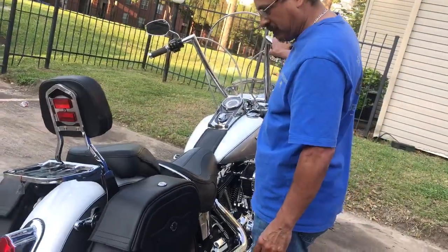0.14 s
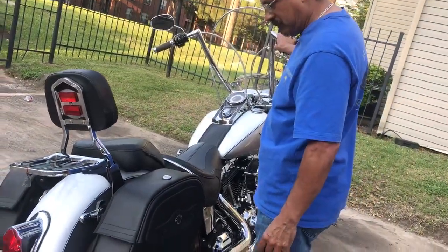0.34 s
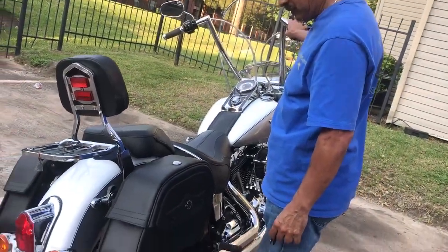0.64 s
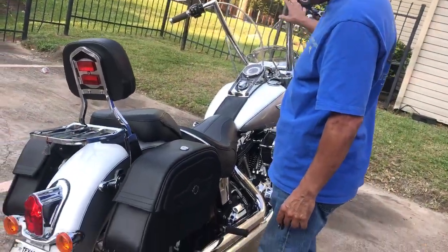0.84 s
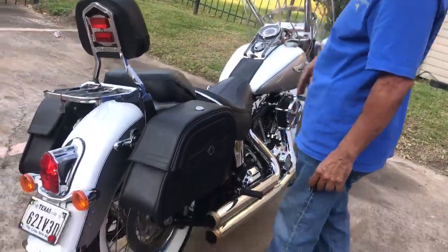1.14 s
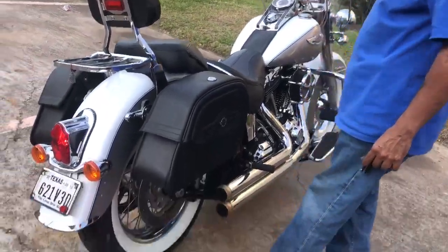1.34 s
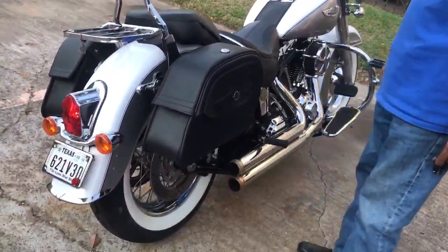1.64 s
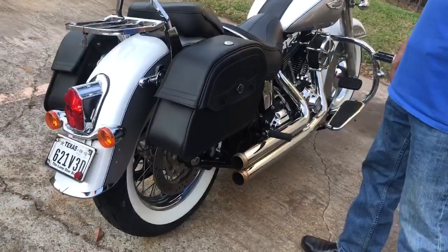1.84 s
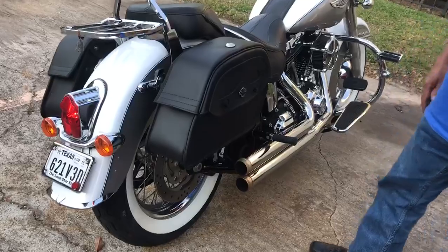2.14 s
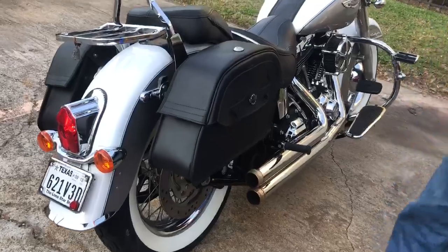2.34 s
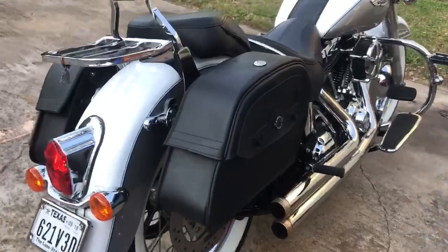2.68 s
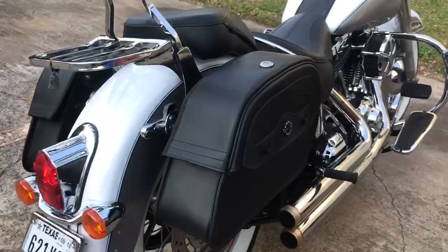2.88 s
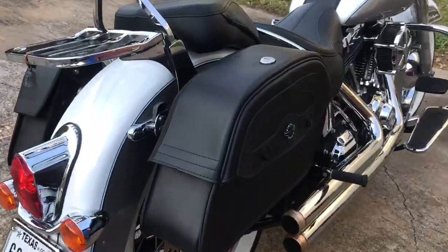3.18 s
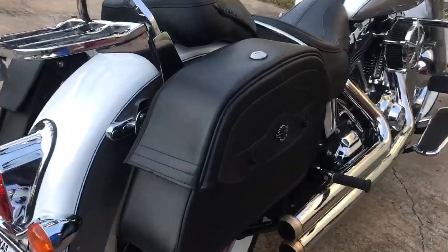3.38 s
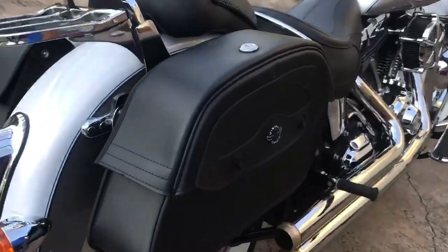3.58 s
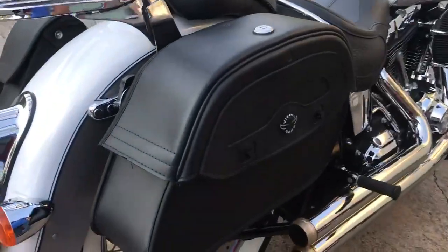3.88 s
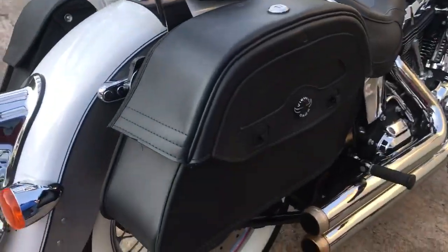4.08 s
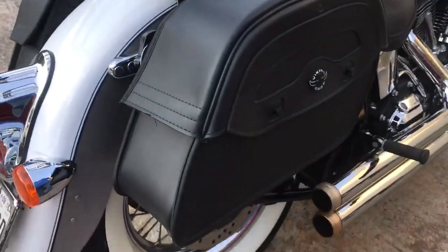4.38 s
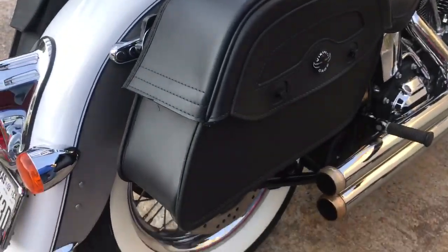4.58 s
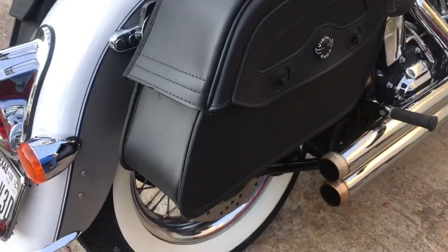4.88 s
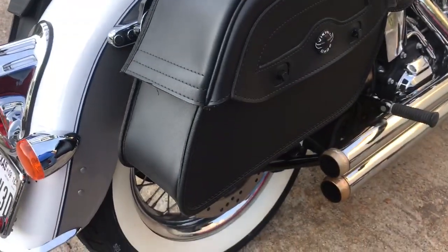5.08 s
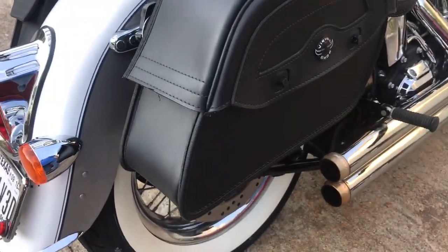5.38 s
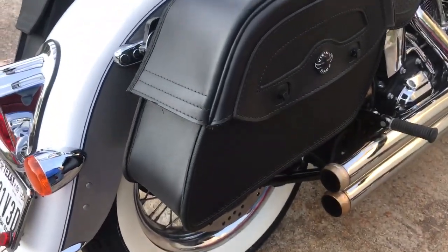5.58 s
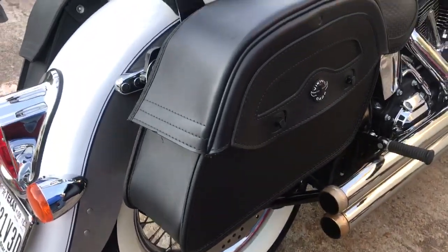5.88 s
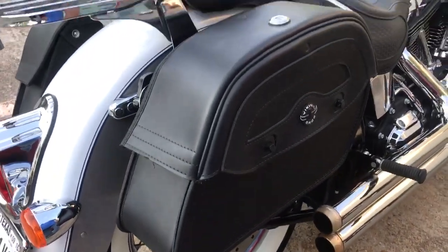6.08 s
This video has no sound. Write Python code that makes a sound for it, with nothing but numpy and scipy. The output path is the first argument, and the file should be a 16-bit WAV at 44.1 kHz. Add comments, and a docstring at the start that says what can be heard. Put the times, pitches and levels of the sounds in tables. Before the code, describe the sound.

Outdoors, close to a large motorcycle, an electric starter whines and grinds, sagging over several compressions for about half a second. The engine catches with a deep bang, races briefly, then drops into a loping two-cylinder idle. Sharp exhaust barks and low booms come unevenly, with skipped beats, over valve ticks and mechanical rustle.

```python
"""Outdoors, a big V-twin motorcycle starts: the electric starter labours over compressions with whirring gears,
then the engine catches with a bang and settles into a loping idle with skipped beats.
Each cylinder blows into its own open pipe: a noisy jet rings the pipe mouth as a sharp bark, and the gas
column booms as a sum of sines that slide in pitch. Valves tick and ring; the engine rustles as shaped noise."""
import sys
import numpy as np
from scipy.fft import rfft, irfft, next_fast_len
from scipy.io import wavfile
from scipy.ndimage import map_coordinates

SR = 44100
rng = np.random.default_rng(int(sys.argv[2]) if len(sys.argv) > 2 else 0)


def bounce(signal):
    """Save signal as a 16-bit WAV file at the path given by the first command-line argument."""
    frames = np.transpose(np.atleast_2d(signal))
    limited = np.clip(frames, -1, 1)
    pcm = np.round(limited * 32767).astype(np.int16)
    wavfile.write(sys.argv[1], SR, pcm)


N = 274302
TIME = np.arange(N) / SR  # seconds from the beginning
AGE = np.arange(SR // 4) / SR  # seconds since a stroke or knock


def amp(db):
    """Turn decibels into gain."""
    return 10 ** (np.asarray(db) / 20)


def unit(x):
    """Scale to rms 1."""
    return x / np.sqrt(np.mean(x ** 2) + 1e-20)


def curve(rows):
    """Join (time_s, value) rows with straight lines, one value per sample."""
    return np.interp(TIME, *np.transpose(rows))


def wobble(rate):
    """A smooth random curve through `rate` random points a second."""
    points = rng.standard_normal(int(N * rate / SR) + 4)
    return map_coordinates(points, [TIME * rate], order=2)


def noise(spectrum):
    """Noise of rms 1, coloured by (pitch_hz, level_db) rows."""
    pitch_hz, level_db = np.transpose(spectrum)
    size = next_fast_len(N + 8192)
    log_hz = np.log(np.fft.rfftfreq(size, 1 / SR) + 1)
    gain = amp(np.interp(log_hz, np.log(pitch_hz), level_db))
    white = rng.standard_normal(size)
    return unit(irfft(rfft(white) * gain, size)[:N])


def add(track, start_s, sound):
    """Mix a sound into a track, cutting it off at the track's end."""
    start = max(round(start_s * SR), 0)
    part = track[start:start + len(sound)]
    part += sound[:len(part)]


def burst(rise_s, t60_s):
    """A loudness shape of peak 1 that swells, then dies; t60_s is the time to fall 60 dB."""
    shape = (1 - np.exp(-(AGE / rise_s) ** 2)) * amp(-60 * AGE / t60_s)
    return shape / shape.max()


def boom(pipe):
    """The gas column rings; its modes slide in pitch as the outflow dies, a little differently each time."""
    out = np.zeros(len(AGE))
    for start_hz, end_hz, glide_s, swell_s, t60_s, level_db in pipe:
        heat, pace, size = 1 + np.array([.012, .05, .08]) * rng.standard_normal(3)
        slide = np.exp(-(pace * AGE / glide_s) ** 2)
        pitch_hz = heat * (end_hz + (start_hz - end_hz) * slide)
        wave = np.sin(2 * np.pi * np.cumsum(pitch_hz) / SR)
        swell = 1 - np.exp(-AGE / swell_s)
        out += size * amp(level_db - 60 * AGE / t60_s) * swell * wave
    return out


def ring(modes, rise_s, slide=0, detune=0.042):
    """Short ringing modes; pitches, strengths and phases are drawn anew each time, and slide > 0 bends them up."""
    pitch_hz, level_db, t60_s = np.transpose(modes)
    pitch_change, size, phase = rng.standard_normal((3, len(pitch_hz)))
    gain = amp(level_db + 4.5 * size)
    clock = np.cumsum(1 + slide * (AGE / .03 - 1 / 2) / (1 + AGE / .03)) / SR
    turns = np.outer(pitch_hz * (1 + detune * pitch_change), clock)
    waves = np.sin(2 * np.pi * (turns + phase[:, None]))
    shapes = [burst(rise_s, life_s) for life_s in t60_s]
    return gain / np.linalg.norm(gain) @ (waves * shapes)


# The starter pushes a piston over the top: time_s [s], load_db [dB, relative].
COMPRESSIONS = [(-.03, -33), (.197, -19.5), (.4, -21), (.562, -19)]
# Unburnt air leaves the pipes: start_s [s], level_db [dB, relative].
PUFFS = [(.125, -29), (.28, -28), (.49, -28), (.56, -29)]
# Colour of the gear whirr: pitch_hz [Hz], level_db [dB per Hz, relative].
WHIRR_COLOUR = [(60, -0.5), (130, -5), (300, -4.5), (600, -15), (790, -3), (900, -7), (1500, -5.5),
                (2300, -12.5), (3300, -25.5), (4000, -25), (6200, -29), (7800, -43), (10000, -36.5),
                (16000, -72)]
TAKE_UP_S, TAKE_UP_DB = 0.016, -6.5  # the gears also knock together just before each compression
FREE_MESH_HZ, SAG_HZ = 1775, 710  # gear whine when spinning freely, and its drop under load
SAG_LAG_S, SAG_FALL_S, SAG_RECOVER_S = 0.034, .029, .036  # the motor is slowest just after the top
FREE_DB, LABOUR_DB, LABOUR_RISE_S, LABOUR_FADE_S = -33, 5, 0.011, 0.078  # gear noise, and its swell under load
# faint high hiss that swells about 0.12 s after each compression
HISS_DB, HISS_SWELL_DB, HISS_LAG_S, HISS_WIDTH_S = -71, 12, 0.12, 0.039


def starter():
    """Gears whirr and whine; each compression slows them down and makes them grind."""
    cranking = np.clip((CATCH[0][0] + 0.015 - TIME) / 0.02, 0, 1)  # fades out as the engine catches
    load, puffs, labour, sag, hiss_swell = np.zeros((5, N))
    for top_s, load_db in COMPRESSIONS:
        since = TIME - top_s
        labour += np.exp(-np.where(since < 0, (since / LABOUR_RISE_S) ** 2, since / LABOUR_FADE_S))
        sag_width = np.where(since < SAG_LAG_S, SAG_FALL_S, SAG_RECOVER_S)
        sag += np.exp(-((since - SAG_LAG_S) / sag_width) ** 2)
        hiss_swell += np.exp(-((since - HISS_LAG_S) / HISS_WIDTH_S) ** 2)
        for lead_s, knock_db in (0, load_db), (TAKE_UP_S, load_db + TAKE_UP_DB):
            # each knock begins 6 ms early, to swell up towards its moment
            load += amp(knock_db) * np.interp(since + lead_s + .006, AGE, burst(.005, .09))
    for start_s, level_db in PUFFS:
        add(puffs, start_s, amp(level_db) * boom([(58, 80, .08, .04, .3, 14)]))

    level = amp(FREE_DB + LABOUR_DB * labour)
    mesh_hz = (FREE_MESH_HZ - SAG_HZ * sag) * (1 + .03 * wobble(300))
    phase = 2 * np.pi * np.cumsum(mesh_hz) / SR
    whine = (np.sin(phase) + .25 * np.sin(phase * 2 / 3)) * amp(2.5 * wobble(160))
    strain = .3 * level + 1.25 * load
    whirr = (level * amp(0.5 + 1.44 * wobble(149.2)) + amp(-5) * load) * noise(WHIRR_COLOUR)
    grind_colour = [(1500, -30), (2600, 5), (3400, 0), (6200, -4), (7800, -31), (16000, -33)]
    grind = amp(-13.5) * load * noise(grind_colour)
    hiss_colour = [(5000, -35), (9000, -6), (13000, -1), (16000, -10)]
    hiss = amp(HISS_DB + HISS_SWELL_DB * hiss_swell) * noise(hiss_colour)
    return cranking * (strain * whine + whirr + grind + hiss) + puffs * amp(6.0 * wobble(62.5))


# Short rings of the pipe mouths: pitch_hz [Hz, typical], level_db [dB, relative], t60_s [s].
BARK_MODES = [(568.5, -18.5, 0.15), (933, -7, 0.021), (1420, 5, 0.013), (2199, 3, 0.037),
              (2824, -2.5, 0.019)]
CRACK_MODES = [(3928, -2.5, 0.037), (4440, 1.5, 0.016), (5590, 10, 0.019), (6450, -4, 0.025)]
# Colours of the jet noise: pitch_hz [Hz], level_db [dB per Hz, relative].
BARK_COLOUR = [(200, 7), (450, -12.5), (700, -4), (1000, 6.5), (1400, 1.5), (2300, 2.5), (2900, -5),
               (3400, -20.5), (6000, -33.5)]
CRACK_COLOUR = [(1800, -1), (3200, -0.5), (4300, -1), (5500, 3), (6400, 1.5), (7300, -9), (10000, -8.5),
                (13000, -13), (16000, -24)]
# Hollow ring after each stroke: time_s [s], pitch_hz [Hz, before a small random drift].
HOLLOW_PITCH = [(1.0, 1444), (2.0, 1488), (3.24, 1417), (3.9, 1273), (6.2, 1357)]
# How squarely the pipes face the microphone: time_s [s], level_db [dB, of the hollow ring].
MOUTH = [(.62, -4.5), (2.2, 2), (2.9, 6), (4, 7), (4.6, 1)]
CLEAR_DB, JET_DB = 5, -2.5  # strength of the mouth rings, and of the bark's jet noise
FLARE_FLOW, FLARE_END_S, FLARE_FADE_S = 0.83, 1.24, 0.28  # extra gas flow (0-1) while the engine races


def exhaust(strokes, pipe, rise_s, blow_t60_s, tail_db, hollow_db):
    """Each stroke is a jet of noise that rings the pipe mouth, booms the pipe and leaves a rushing tail."""
    booms, rings, bark, crack, hollow, roar = np.zeros((6, N))
    jet, tail, pop = burst(rise_s, blow_t60_s), burst(0.0065, 0.12), burst(0.0015, 0.005)
    for start_s, boom_db, bark_db, crack_db in strokes:
        flare = FLARE_FLOW * np.clip((FLARE_END_S - start_s) / FLARE_FADE_S, 0, 1)
        add(booms, start_s, amp(boom_db - 135 * flare * AGE) * boom(pipe))  # fast outflow damps the pipe
        add(roar, start_s, amp(boom_db - 22 + 16 * flare) * burst(.006, .08))
        add(rings, start_s, amp(bark_db + CLEAR_DB) * ring(BARK_MODES, 0.23 * rise_s, slide=0.051))
        add(rings, start_s, amp(crack_db + CLEAR_DB) * ring(CRACK_MODES, rise_s))
        add(bark, start_s - .002, amp(bark_db - 0.5) * pop)  # the valve cracks open just before the jet
        add(bark, start_s, amp(bark_db + JET_DB) * (jet + amp(tail_db) * tail))
        add(crack, start_s, amp(crack_db) * (jet + amp(tail_db - 6.5) * tail))
        add(hollow, start_s, amp(0.5 * bark_db + hollow_db) * burst(0.0043, 0.15))

    ring_strength = wobble(220)
    ring_hz = curve(HOLLOW_PITCH) + 70 * wobble(30)
    hollow_ring = unit(ring_strength * np.sin(2 * np.pi * np.cumsum(ring_hz) / SR))
    roar_colour = [(120, -8.5), (280, -1.5), (420, -17.5), (1500, -51)]
    turbulence = bark * noise(BARK_COLOUR) + crack * noise(CRACK_COLOUR) + roar * noise(roar_colour)
    return booms + rings + turbulence + amp(curve(MOUTH)) * hollow * hollow_ring


# The first, slow-burning charge: start_s [s], boom_db, bark_db, crack_db [dB, relative].
CATCH = [(.6185, -5.5, -10.5, -20)]
# Pipe modes of that bang, typical values: start_hz, end_hz [Hz], glide_s, swell_s, t60_s [s],
# level_db [dB, relative].
CATCH_PIPE = [(52, 123, 0.046, 0.037, 0.18, 15.5), (133, 360, 0.021, 0.069, 0.1, 2.5),
              (283, 400, .03, 0.021, 0.051, -16)]


def first_bang():
    """The engine catches: one slow burn gives a longer jet and a deep boom."""
    return exhaust(CATCH, CATCH_PIPE, rise_s=0.006, blow_t60_s=0.07, tail_db=-10, hollow_db=-20)


# The engine races as it catches, then hunts around its idle: time_s [s], crank_rpm [turns a minute].
SPEED = [(0.7, 1114.5), (0.95, 1203.4), (1.25, 1044.5), (1.55, 1003.9), (2.0, 1032.9), (2.15, 984.2),
         (2.45, 1034.4), (3.05, 926.9), (3.65, 921.3), (3.8, 954.5), (4.4, 948.7), (5.15, 1009.5),
         (5.45, 990.0), (6.2, 1083.8)]
FIRST_STROKE_S = .696


def firing_times(lag):
    """A cylinder fires once in two crank turns, lag cycles after the front one."""
    running = TIME >= FIRST_STROKE_S
    cycles = np.cumsum(curve(SPEED)[running]) / (2 * 60 * SR)
    return np.interp(np.arange(lag, cycles[-1]), cycles, TIME[running])


# Strength of an ordinary exhaust stroke: time_s [s], boom_db, bark_db [dB, before each cylinder's offset].
EFFORT = [(.7, -9, -11.5), (.88, -10, -14.5), (1.15, -14.5, -19), (1.9, -12.5, -22.5), (2.4, -11.5, -20),
          (3.2, -10.5, -17.5), (4.0, -10.5, -17), (4.8, -11.5, -18), (6.2, -11.5, -21)]
# Charges that burn badly (below 0) or bang (above 0): time_s [s], boom_change_db, bark_change_db [dB].
ODD_BURNS = [(.742, -1.5, -2.5), (.801, -2, 0.5), (.947, -6, -15), (1.004, -5.5, -8), (1.052, -8, -29),
             (1.219, -0.5, -6.5), (1.271, -4.5, -9), (1.502, -1, -7.5), (2.093, 1, 5.5), (2.161, 1.5, 3.5),
             (2.282, -1, 5), (2.568, -7.5, -18), (2.756, -13, -16), (2.934, -0.5, 5.5), (3.012, -6.5, -29),
             (3.063, -4.5, -6), (3.193, -0.5, 5.5), (3.263, -5, -8), (3.322, -0.5, -4), (3.451, -0.5, -0.5),
             (3.523, -4, -9), (3.577, -9.5, -25), (3.781, -6.5, -12), (3.836, -0.5, -5), (3.963, 0, 0),
             (4.035, -13, -39), (4.09, 2, 3), (4.342, -6.5, -19), (4.413, 0.5, 3), (4.595, -23, -24),
             (4.838, -0.5, -12.5), (5.2, -1, -9), (5.44, -12, -15), (5.678, -4, -11.5), (5.745, -1.5, 3),
             (5.912, -2.5, -27)]
REBOUND_BOOM_DB, REBOUND_BARK_DB = 1.5, 2.5  # leftover fuel strengthens the same cylinder's next stroke
FULL_MISS_DB = 20.5  # a bark this much weaker leaves all the fuel unburnt
SCATTER_DB = 3.87  # chance difference between barks; booms get half of it


def cylinder(lag, boom_db, bark_db, crack_db):
    """List the strokes (start_s, boom_db, bark_db, crack_db): effort sets each, and a misfire feeds the next."""
    start_s = firing_times(lag)
    effort_s, effort_boom_db, effort_bark_db = np.transpose(EFFORT)
    odd = np.array(ODD_BURNS)
    is_odd = abs(start_s[:, None] - odd[:, 0]) < .02  # strokes within 20 ms of a listed burn
    boom_change, bark_change = (is_odd @ odd[:, 1:]).T
    leftover = np.r_[0, np.clip(-bark_change[:-1] / FULL_MISS_DB, 0, 1)]
    chance = SCATTER_DB * rng.standard_normal(len(start_s))
    boom_level = np.interp(start_s, effort_s, effort_boom_db) + boom_change
    boom_level += REBOUND_BOOM_DB * leftover + boom_db + chance / 2
    bark_level = np.interp(start_s, effort_s, effort_bark_db) + bark_change
    bark_level += REBOUND_BARK_DB * leftover + bark_db + chance
    return np.transpose([start_s, boom_level, bark_level, bark_level + crack_db])


# Front pipe modes, typical values: start_hz, end_hz [Hz], glide_s, swell_s, t60_s [s], level_db [dB, relative].
FRONT_PIPE = [(46.5, 78.7, 0.022, 0.036, 0.23, 8), (183.6, 59.2, 0.0098, 0.02, 0.13, 11),
              (157.2, 290, 0.02337, 0.027, 0.13, 5), (250, 420, 0.0242, 0.0037, 0.05, -18.5)]


def front_cylinder():
    """The front cylinder's strokes blow into its own pipe."""
    strokes = cylinder(0, boom_db=0.9, bark_db=-2.07, crack_db=-8)
    return exhaust(strokes, FRONT_PIPE, rise_s=0.0023, blow_t60_s=0.022, tail_db=-7, hollow_db=-21.0)


# Rear pipe modes, typical values: start_hz, end_hz [Hz], glide_s, swell_s, t60_s [s], level_db [dB, relative].
REAR_PIPE = [(43.7, 107.7, .021, 0.027, 0.25, 7.5), (193.4, 62.1, 0.011, .019, 0.13, 9),
             (202, 295, 0.0255, 0.018, 0.12, -14)]
REAR_LAG = .4364  # share of a cycle from the front stroke to the rear one


def rear_cylinder():
    """The rear cylinder fires less than half a cycle after the front one, so the beat lopes."""
    strokes = cylinder(REAR_LAG, boom_db=1.0, bark_db=-0.9, crack_db=-9.0)
    return exhaust(strokes, REAR_PIPE, rise_s=0.0019, blow_t60_s=0.022, tail_db=-9.0, hollow_db=-17.5)


# Valve ticks in each cycle: delay_s [s after the front stroke, typical], level_db [dB, relative].
VALVES = [(0.016, -29), (0.021, -45), (.041, -25), (0.094, -28)]
# Ringing of the valves: pitch_hz [Hz, typical], level_db [dB, relative], t60_s [s].
VALVE_MODES = [(1120, 3.5, 0.065), (1566, -2, 0.14), (2116, -3.5, 0.038), (2720, -7.5, 0.041)]
# Colour of the engine's rustle: pitch_hz [Hz], level_db [dB per Hz, relative].
RUSTLE_COLOUR = [(30, -17), (70, -7), (140, -2.5), (280, -2), (420, -14.5), (650, -10), (900, -6.5),
                 (1400, -14.5), (2200, -18), (3500, -32.5), (5700, -31.5), (7200, -41), (10000, -43),
                 (11500, -56), (16000, -60)]
RUSTLE_DB, RUSTLE_SWELL_DB, RUSTLE_SWELL_S = -31.5, 11.5, 0.38  # the rustle builds up once the engine runs
SHUDDER_DB, SHUDDER_S = 26, 0.076  # the first bang shakes the whole machine


def mechanics():
    """Valves tick and ring soon after each front stroke, over the rustle of the running engine."""
    ticks, clinks = np.zeros((2, N))
    tick = burst(0.0015, 0.016)
    for stroke_s in firing_times(0):
        for delay_s, level_db in VALVES:
            late, size = rng.standard_normal(2)
            start_s = stroke_s + delay_s + 0.001045 * late
            gain = amp(level_db + 2 * size)
            add(ticks, start_s, gain * amp(-17) * tick)
            add(clinks, start_s, gain * amp(-0.5) * ring(VALVE_MODES, rise_s=0.00043, detune=0.0567))
    age = np.maximum(TIME - CATCH[0][0], 0)  # seconds since the engine caught
    level_db = RUSTLE_DB - RUSTLE_SWELL_DB * np.exp(-age / RUSTLE_SWELL_S)
    level_db += SHUDDER_DB * np.exp(-(age / SHUDDER_S) ** 2)
    rustle = amp(level_db + 2.7 * wobble(45)) * noise(RUSTLE_COLOUR)
    return ticks * noise(CRACK_COLOUR) + clinks + np.clip(age / 0.025, 0, 1) * rustle


def scene():
    """Starter, first bang, both cylinders and the engine's mechanics, in one channel."""
    return (starter() + first_bang() + front_cylinder() + rear_cylinder() + mechanics())[None]


TOP_HZ = 16000  # the microphone's upper limit


def record(dry):
    """The microphone rounds off the loudest peaks, thins the deepest bass and keeps nothing above its limit."""
    rounded = dry / (1 + (dry / .73) ** 8) ** (1 / 8)
    size = next_fast_len(N + 8192)
    hz = np.fft.rfftfreq(size, 1 / SR)
    bass_cut = 1 - 1 / (1 + (hz / 34) ** 4)
    return irfft(rfft(rounded, size) * bass_cut * (hz < TOP_HZ), size)[:, :N]


dry = scene()
out = record(dry)
bounce(out)
```